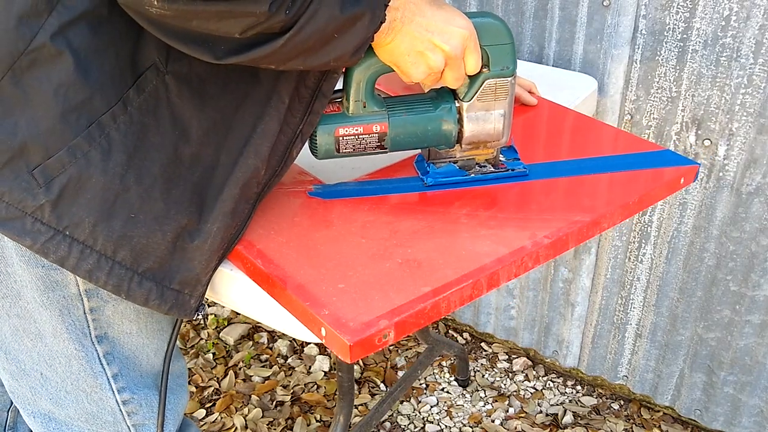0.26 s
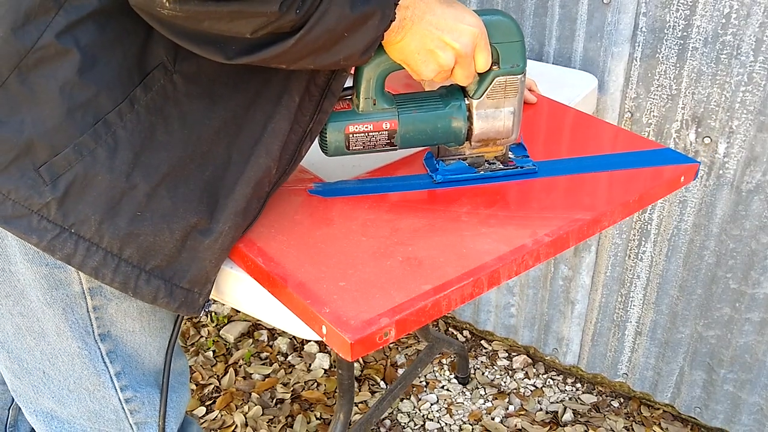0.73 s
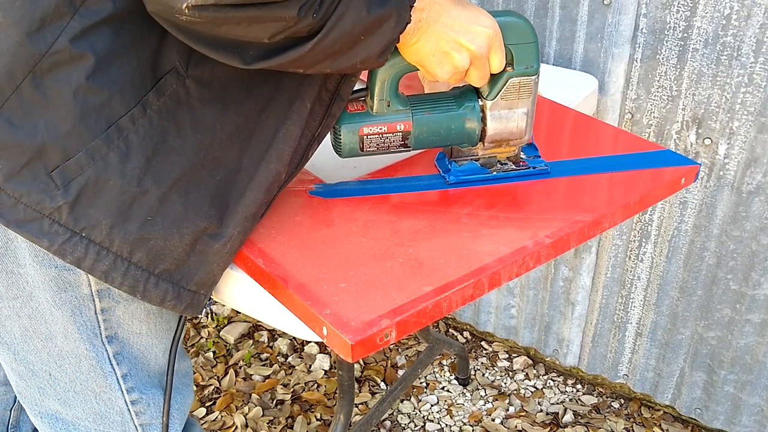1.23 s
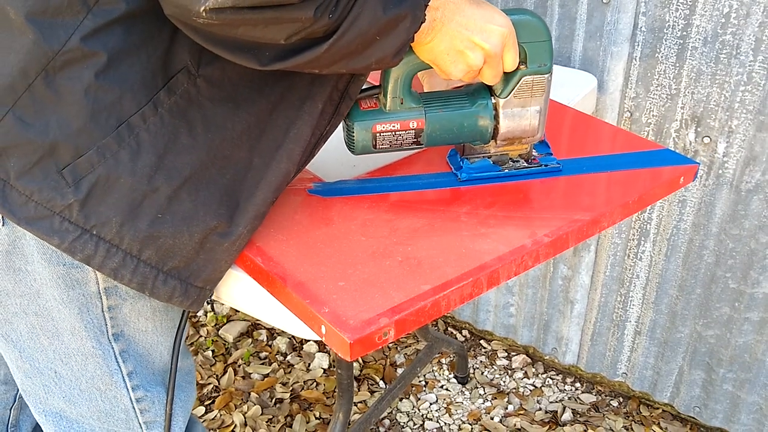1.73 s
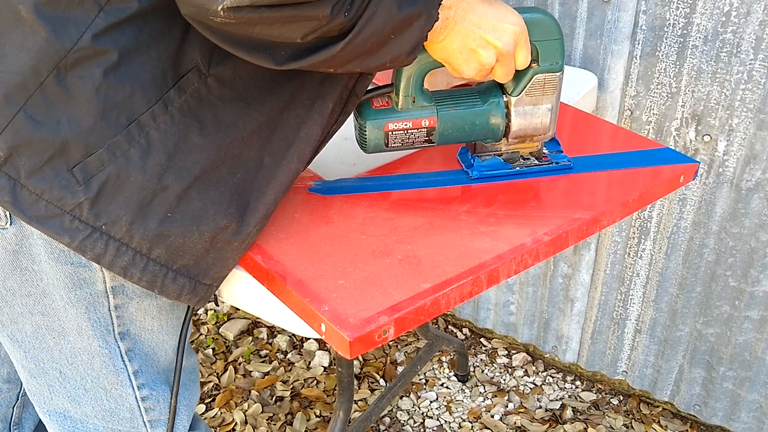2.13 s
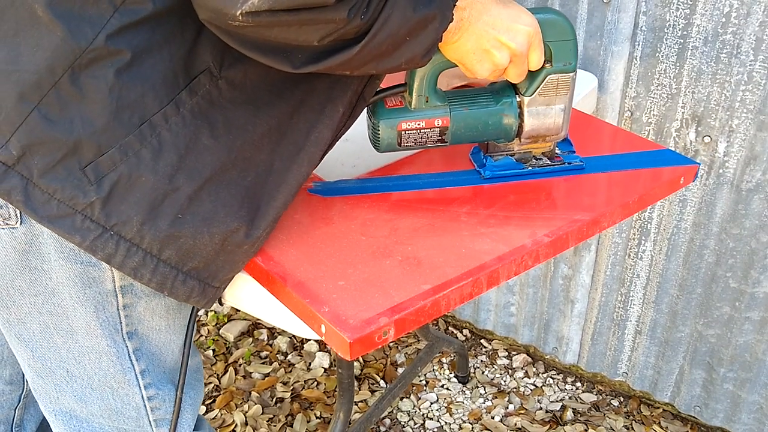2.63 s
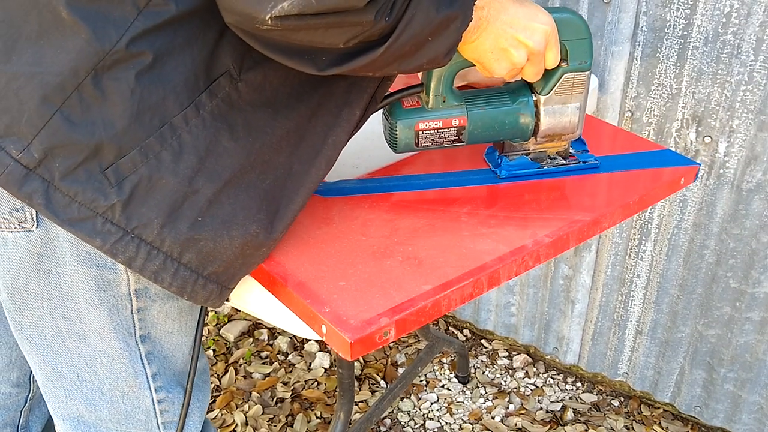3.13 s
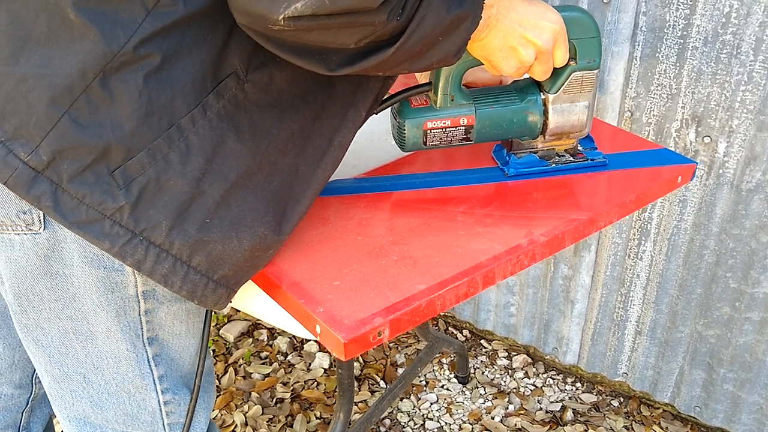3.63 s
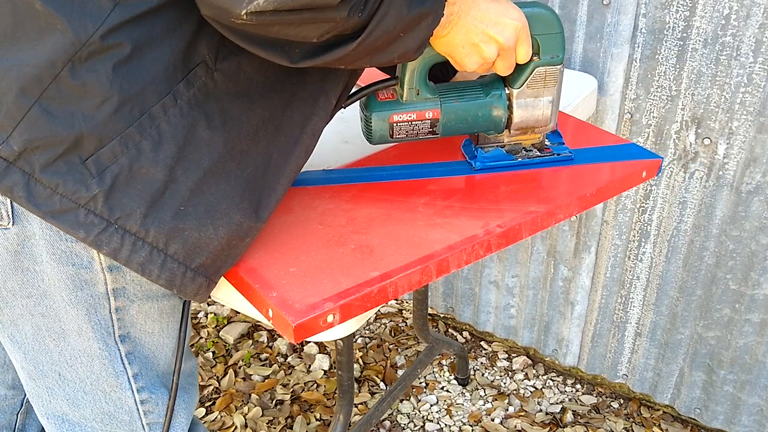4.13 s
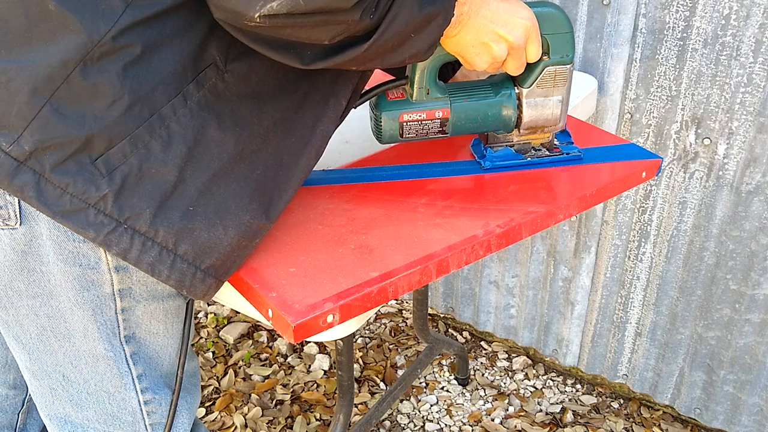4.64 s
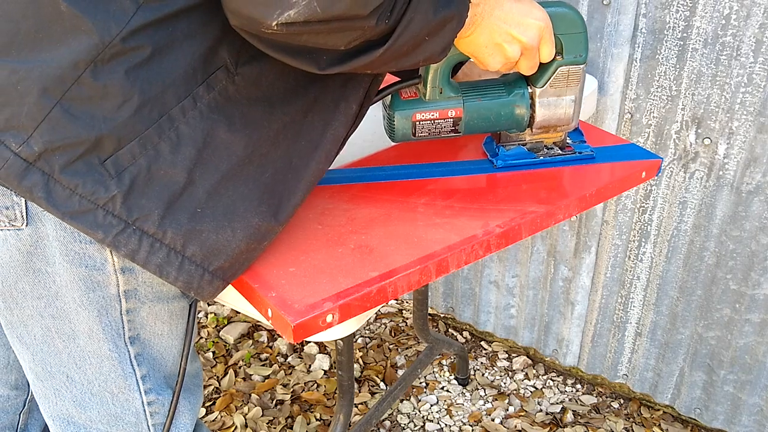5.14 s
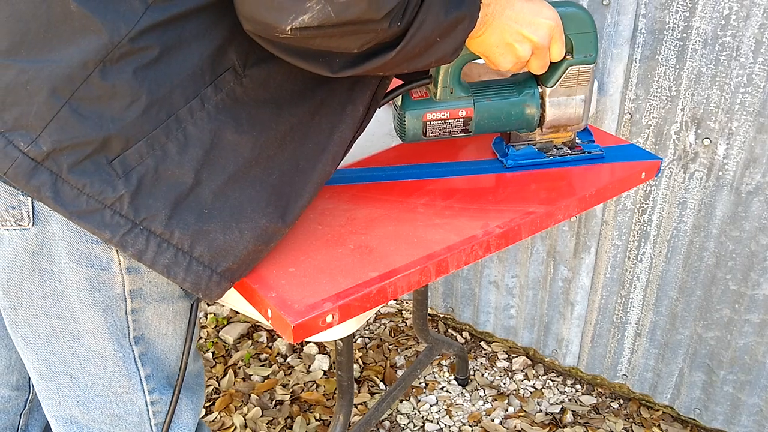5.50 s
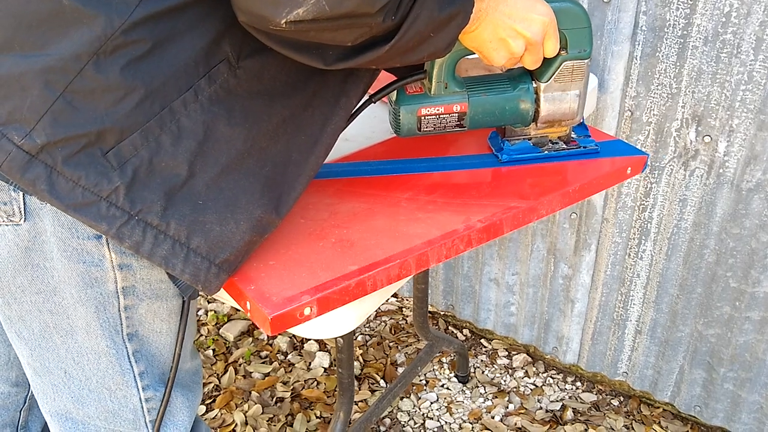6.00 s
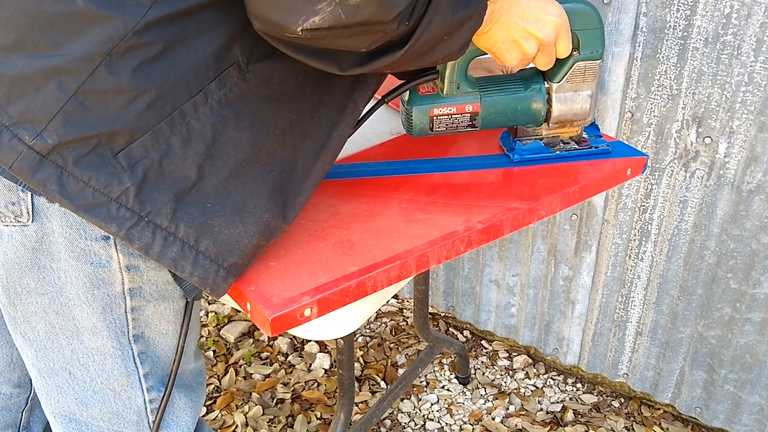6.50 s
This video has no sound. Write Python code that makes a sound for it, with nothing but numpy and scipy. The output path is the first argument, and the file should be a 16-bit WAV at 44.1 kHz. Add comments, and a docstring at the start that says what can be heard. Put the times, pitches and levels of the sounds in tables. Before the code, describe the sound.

A jigsaw rasps through a metal shelf, screeching in quick pulses as the blade bites, with brief squeals and a few soft knocks.

```python
"""Jigsaw cutting sheet steel

A jigsaw cuts a painted sheet-steel shelf outdoors. Its motor sags and recovers about seven times a
second as the blade bites; a screech and a faint whine swing with that speed over the rasp of the teeth.
The sheet's resonances colour rasp and screech. The cut eases twice, the blade sings, scrapes and
squeals as it bites and catches, and the shelf knocks on its support."""
import sys
import numpy as np
from scipy import signal
from scipy.fft import rfft, irfft, next_fast_len
from scipy.io import wavfile
from scipy.ndimage import uniform_filter1d

SR = 44100
rng = np.random.default_rng(int(sys.argv[2]) if len(sys.argv) > 2 else 0)


def to_wav(s):
    """Save 16-bit WAV."""
    ch = np.atleast_2d(s).T  # columns
    pcm = np.round(np.clip(ch, -1, 1) * 32767)  # PCM
    wavfile.write(sys.argv[1], SR, pcm.astype(np.int16))


N = 298116
TIME = np.arange(N) / SR
DIRECT = np.eye(2)[:, :1]  # sources have two rows: the direct sound and the scattered sound
EDGE_HZ, MODE_FADE_S = 15800, 0.28

# How hard the teeth are pushed into the steel: time_s, relative_db
TOOTH_PRESSURE = [(0, -51), (0.33, -51.0), (0.7, -50), (1.9, -50.5), (2.2, -49.5), (2.35, -51), (2.6, -50),
                  (3.62, -50.0), (3.74, -53), (4.1, -50.5), (4.4, -50), (5.1, -50), (5.63, -49),
                  (5.72, -53), (5.79, -48), (6.12, -50.5), (6.3, -49), (6.76, -49.5)]
# How hard the blade rubs in its slot: time_s, relative_db
SLOT_FRICTION = [(0, -51), (0.33, -53), (0.6, -43.5), (0.9, -41.5), (2.0, -40), (2.35, -43.5), (2.8, -42.5),
                 (3.55, -42.5), (3.72, -54), (4.03, -65), (4.2, -41), (5.0, -41), (5.62, -43), (5.72, -78),
                 (5.84, -39.5), (6.12, -47.5), (6.3, -42.5), (6.76, -47)]


def amp(db):
    """Decibels to amplitude ratio."""
    return 10 ** (np.asarray(db) / 20)


def unit_rms(x):
    """Normalisation to rms 1."""
    return x / np.sqrt(np.mean(x ** 2) + 1e-20)


def over_time(points):
    """Linear interpolation of a time table at every sample."""
    return np.interp(TIME, *np.transpose(points))


def over_frequency(points, hz):
    """Interpolation of a spectrum table on a log-frequency axis."""
    point_hz, value = np.transpose(points)
    return np.interp(np.log(hz + 1), np.log(point_hz + 1), value)


def fade(t, start, end, fade_s):
    """Trapezoidal window, with a ramp centred on each of start and end."""
    return np.clip(np.minimum(t - start, end - t) / fade_s + .5, 0, 1)


def wander(rate_hz):
    """Random modulation: noise of rms 1, low-passed at rate_hz."""
    size = next_fast_len(int(min(8 * rate_hz, SR) * N / SR))
    hz = np.arange(size // 2 + 1) * SR / N
    coarse = irfft(rfft(rng.standard_normal(size)) / (1 + (hz / rate_hz) ** 4), size)
    return unit_rms(np.interp(TIME, np.linspace(0, N / SR, size), coarse))


def spectra(x, size=1024):
    """Short-time Fourier transform: Hz as a column, seconds, values."""
    hz, t, z = signal.stft(x, SR, nperseg=size, noverlap=size - size // 4)
    return hz[:, None], t, z


def sound_of(z, size=1024):
    """Overlap-add synthesis from short-time spectra."""
    return signal.istft(z, nperseg=size, noverlap=size - size // 4)[1][..., :N]


def ripple(shape, bins, frames):
    """Random field of rms 1, correlated over so many frequency bins and time frames."""
    across_bins = uniform_filter1d(rng.standard_normal(shape), bins, 0)
    return unit_rms(uniform_filter1d(across_bins, frames, 1))


def resonate(x, hz, width_hz):
    """Heterodyne filtering: a flat-topped resonance of gain 1 that follows the curve hz."""
    carrier = np.exp(2j * np.pi * np.cumsum(hz) / SR)
    low_pass = signal.butter(3, width_hz / 2, fs=SR, output="sos")
    return 2 * (carrier * signal.sosfilt(low_pass, x * carrier.conj())).real


def ring(mode_hz, width_hz):
    """Random excitation of one mode by friction: a two-second loop of rms 1."""
    size = 2 * SR
    hz = np.fft.rfftfreq(size, 1 / SR)
    response = 1 / (1 + (2 * (hz - mode_hz) / width_hz) ** 2)
    loop = unit_rms(irfft(rfft(rng.standard_normal((2, size))) * response, size))
    return np.tile(loop, N // size + 1)[:, :N]


def chatter(turns, steady, decay_turns, uneven_db):
    """Amplitude modulation: friction noise bursts once a rotor turn, each time at a random strength."""
    strength = amp(uneven_db * rng.standard_normal(4096))[turns.astype(int)]
    bursts = strength * np.exp(-(turns % 1) / decay_turns)
    return unit_rms((steady + bursts) * rng.standard_normal((2, N)))


def rumble(level_db=-91.5, cutoff_hz=110, swing_db=3.5):
    """Slow modulation of low-passed noise: a faint rumble comes and goes."""
    low_pass = signal.butter(2, cutoff_hz, fs=SR, output="sos")
    low = signal.sosfilt(low_pass, rng.standard_normal((2, N)))
    return unit_rms(low * amp(swing_db * wander(4.4))) * amp(level_db)


def shelf_knocks(trim_db=-9, rattle_s=0.0056, scattered=0.71):
    """Impact excitation: soft, scuffing blows on the support ring the shelf's damped low modes."""
    # Blows: start_s, relative_db
    blows = [(1.713, -40), (1.783, -37), (1.792, -40), (1.815, -35), (1.834, -37), (1.865, -41),
             (1.888, -47), (2.319, -45), (3.805, -55), (5.44, -46), (5.778, -38.5), (5.799, -47),
             (6.24, -50), (6.53, -44)]
    # Low modes of the shelf, raised up to 4 % at each blow: pitch_hz, relative_db, t60_s
    modes = [(300, 1.5, 0.028), (370, 2, 0.044), (423, 2.5, 0.044), (561, 3.5, 0.053), (698, 1, 0.031),
             (940, -3, 0.032), (1020, 0, 0.024), (1420, -5, .025)]
    t, out = np.arange(SR // 5) / SR, np.zeros((2, N))
    for start, db in blows:
        thud = 0
        for k, (hz, mode_db, t60) in enumerate(modes):
            decay = amp(mode_db - 60 * t / t60)
            thud += (-1) ** k * decay * np.cos(2 * np.pi * hz * rng.uniform(1.0, 1.04) * t)
        force = rng.standard_normal((2, len(t))) * t * np.exp(-t / rattle_s) * [[1], [scattered]]
        knock = signal.fftconvolve(force / np.linalg.norm(force[0]), thud[None], axes=1)
        part = out[:, round(start * SR):][:, :len(t)]
        part += amp(db + trim_db) * knock[:, :part.shape[1]]
    return signal.sosfilt(signal.butter(4, 250, "high", fs=SR, output="sos"), out)


def strip_hum(turns, rotor_hz, roughness=.22, hum_db=-6):
    """Forced resonance: motor orders sweep the modes of the strip being cut; the teeth keep it humming."""
    # Modes of the strip: start_s, end_s, rotor_multiple, pitch_hz, width_hz, relative_db
    modes = [(1.6, 2.1, 6, 1020, 120, -63), (2.6, 3.65, 4, 670, 150, -65), (2.85, 3.65, 5, 950, 110, -68),
             (4.27, 5.0, 5, 778, 70, -58), (5.05, 5.7, 5, 780, 70, -64), (4.1, 4.8, 7, 1280, 90, -55),
             (4.8, 5.65, 7, 1255, 90, -56.5), (4.75, 5.7, 6, 1085, 130, -61.5),
             (5.2, 5.65, 8, 1465, 90, -65), (5.8, 6.4, 7, 1260, 130, -63)]
    out = 0
    for start, end, order, hz, width, db in modes:
        in_tune = 1 / (1 + (2 * (order * rotor_hz - hz) / width) ** 2)
        strength = np.sqrt(2) * in_tune * (1 + roughness * wander(40))
        driven = strength * np.cos(2 * np.pi * order * turns + roughness * wander(40))
        hum = amp(hum_db) * ring(hz, width)[0]
        out += amp(db) * fade(TIME, start, end, fade_s=.15) * (driven + hum)
    return out * (1 - DIRECT)


def motor_whine(turns, trim_db=-16, scattered=0.42):
    """Harmonic series: wavering tones at whole multiples of the rotor rate."""
    # Motor orders: rotor_multiple, relative_db
    orders = [(2, -15), (3, -7), (4, 0), (5, -11), (6, -7), (7, -8), (8, -10), (10, -7), (11, -11),
              (13, -11), (14, -11)]
    tones = sum(amp(db) * (1 + .3 * wander(20)) * np.cos(2 * np.pi * k * turns) for k, db in orders)
    return np.sqrt(2) * tones * amp(over_time(TOOTH_PRESSURE) + trim_db) * [[1], [scattered]]


def blade_squeals(trim_db=-1):
    """Friction-driven resonance: the catching blade squeals in a narrow band or scrapes in a wide one."""
    # Catches: peak_s, half_length_s, pitch_hz, width_hz, relative_db
    catches = [(.07, .04, 6350, 500, -50), (0.153, 0.11, 6850, 500, -48.5), (1.219, .05, 4300, 500, -52),
               (1.81, .12, 8000, 80, -48), (1.968, .05, 4200, 300, -56), (2.11, 0.091, 7700, 60, -46),
               (2.65, .6, 4345, 70, -56), (4.198, .04, 5140, 700, -55), (4.251, 1, 2391, 130.4, -61.5),
               (4.448, 0.82, 12650, 888.5, -53), (5.787, 0.038, 5150, 605.2, -48),
               (5.817, 0.021, 6920, 496, -41), (5.83, 0.058, 4400, 402, -53), (5.967, .06, 6610, 700, -50),
               (6.222, 0.053, 6800, 600, -48), (6.371, 0.046, 5140, 600, -52), (6.56, .05, 6200, 450, -49),
               (6.553, 0.062, 5190, 300, -53), (6.708, 0.07, 7390, 89, -44), (6.713, .06, 4950, 600, -48)]
    out = np.zeros((2, N))
    for peak, half_length, hz, width, db in catches:
        at = np.flatnonzero(abs(TIME - peak) < half_length)
        swell = np.cos(np.pi / 2 * (TIME[at] - peak) / half_length) ** 4
        out[:, at] += amp(db + trim_db) * unit_rms(ring(hz, width)[:, at]) * swell
    return out


def blade_singing(load, sharpness=3.2):
    """Modal vibration: the blade's own modes flare up with the load of a bite."""
    # Modes of the blade: start_s, end_s, pitch_hz, width_hz, full_load_db
    modes = [(.75, 1.3, 8330, 90, -51), (1.55, 2.35, 8080, 150, -44.5), (1.6, 2.35, 7650, 69.6, -52),
             (1.595, 2.347, 6900, 160, -50), (2.749, 3.35, 8300, 200, -52), (2.75, 3.501, 8560, 139, -53),
             (4.15, 5.0, 7020, 201, -54), (4.399, 5.0, 8305, 260, -46), (6.3, 6.901, 6330, 160, -57),
             (6.3, 6.9, 7900, 90, -56)]
    ringing = sum(amp(db) * fade(TIME, start, end, MODE_FADE_S) * ring(hz, width)
                  for start, end, hz, width, db in modes)
    return ringing * load ** sharpness


def sheet_resonance(x, lasting_db=1.56, brief_db=2.09, flicker_db=0.6, trim_db=-1.34):
    """Resonant filtering: steady, sliding and many short-lived modes colour the sound of the cut."""
    # Resonances of sheet and saw: centre_hz, width_hz, lift_db
    steady_modes = [(3260, 210, 0.5), (3850, 115, -3.5), (4450, 330, 0.5), (5300, 300, 1.3),
                    (6240, 250, 1.5), (6830, 110, 2), (7940, 190, -4.5), (8200, 130, 0.5),
                    (8550, 140, -1.5), (9000, 160, -3), (10300, 260, 4.5), (11340, 830, 6),
                    (14700, 450, 2.5)]
    # Modes that slide as the cut advances: start_s, end_s, first_hz, last_hz, width_hz, lift_db
    sliding_modes = [(.45, 1.53, 5260, 5300, 227, 4.2), (-1, 1.2, 6300, 5100, 160, 2.8),
                     (0, .7, 3300, 3220, 240, 1.5), (3.9, 6.38, 3293, 3327, 300, 1.5),
                     (.45, 0.94, 7600, 7300, 210, 7.8), (.75, 1.3, 8500, 10000, 98, 3.6),
                     (.8, 2.4, 7800, 8500, 149.2, 4.7), (.8, 1.9, 11000, 11000, 130, 3.2),
                     (.8, 1.45, 16000, 14900, 120, 9.2), (1.6, 2.34, 7800, 7000, 110, 6.7),
                     (1.5, 2.4, 4180, 4000, 110, 2.9), (2.3, 3.04, 4400, 4500, 140.2, 5),
                     (2.1, 2.74, 14370, 14900, 160, 5), (2.3, 2.5, 6600, 6800, 130, 10.5),
                     (2.35, 3.35, 8300, 8500, 130, 5.2), (2.1, 2.8, 10000, 7700, 110, 3.6),
                     (2.55, 4.24, 9370, 9600, 137, 3.6), (1.6, 3.5, 10900, 11000, 140, 5.8),
                     (2.6, 3.32, 6280, 5900, 170, 3.7), (3.25, 3.5, 8700, 11170, 180, 5.4),
                     (3.35, 3.6, 6900, 6900, 120, 3.9), (3.1, 3.73, 14200, 13000, 202, 4.16),
                     (4.1, 5.4, 7000, 7600, 300, 4.2), (4.7, 6.893, 4487, 4470, 90, 5.7),
                     (4.75, 5.16, 9400, 9800, 140, 5.2), (5.05, 5.9, 8630, 9400, 180, 3.2),
                     (5.5, 5.2, 10300, 9470, 80.1, 6.7), (5.7, 6.3, 7100, 6700, 180, 2.54),
                     (6.0, 6.7, 11400, 10620, 220.3, 6.4), (6.1, 6.6, 8420, 7300, 170, 4.2),
                     (6.2, 6.8, 6400, 6500, 160, 3.7), (6.25, 8.6, 7400, 6800, 140, 4)]
    hz, t, z = spectra(x)
    lift_db = sum(db / (1 + (2 * (hz - centre) / width) ** 2) for centre, width, db in steady_modes)
    for start, end, first_hz, last_hz, width, db in sliding_modes:
        centre = np.interp(t, [start, end], [first_hz, last_hz])
        peak = 1 / (1 + (2 * (hz - centre) / width) ** 4)
        flare = 1 + 0.15 * np.interp(t, TIME, wander(8))
        lift_db = lift_db + db * flare * fade(t, start, end, MODE_FADE_S) * peak
    lasting = lasting_db * ripple(z.shape[1:], bins=3, frames=110) * np.minimum(hz / 4000, 1)
    brief = brief_db * ripple(z.shape[1:], bins=2, frames=14)
    flicker = flicker_db * ripple(z.shape[1:], bins=20, frames=12)
    return sound_of(z * amp(lift_db + lasting + brief + flicker + trim_db))


def motor(half_bite_s=.075, bite_swell_db=1.1):
    """Load and speed: each bite slows the rotor and shifts the screech level; load is 1 at its height."""
    # Rotor speed between bites: time_s, rotor_hz
    free_speed = [(0, 165.8), (.5, 191.8), (1.1, 175), (1.45, 185.5), (2.1, 172.9), (2.6, 183),
                  (3.5, 195.5), (4.2, 185.7), (4.85, 181), (5.55, 179.6), (5.8, 178.2), (6.1, 191.2),
                  (6.76, 172.3)]
    # Bites of the blade: slowest_s, lost_hz, extra_screech_db
    bites = [(.07, 13, 6.5), (.145, 26, -4), (0.269, 14.4, 4), (.39, 17, -2), (0.501, 23.5, 1),
             (0.657, 21.4, -1), (.807, 29, 0), (.935, 30, -2.5), (1.086, 35, -2.5), (1.219, 31.6, 1),
             (1.355, 32.6, -1.5), (1.518, 21, 1), (1.666, 30, 0), (1.817, 26, -1), (1.965, 33.4, -1),
             (2.113, 25.6, -1), (2.264, 30.6, -1), (2.399, 16.5, -2), (2.558, 25.3, 1.5), (2.697, 26, 1),
             (2.851, 31.4, 1.5), (2.981, 32.6, 2), (3.126, 32, 1.5), (3.271, 30, 2.5), (3.415, 21.5, 1),
             (3.579, 28, 2.5), (3.941, 26.6, -5), (4.2, 41.5, 0), (4.348, 27.2, -4), (4.493, 29.4, -1),
             (4.629, 28, -3.5), (4.772, 26, -2), (4.926, 27.4, -1), (5.074, 18.7, -1.5), (5.213, 22.4, -1),
             (5.357, 26.3, -1), (5.489, 29, -2.5), (5.654, 30, 1), (5.814, 32, -2), (5.93, 25, 1),
             (6.052, 19.5, 0), (6.226, 19, 0.5), (6.371, 27, 1.5), (6.56, 38, 0.5), (6.711, 32, 6)]
    rotor_hz, screech_db, load = over_time(free_speed), over_time(SLOT_FRICTION), np.zeros(N)
    for slowest, lost_hz, extra_db in bites:
        at = np.flatnonzero(abs(TIME - slowest) < half_bite_s)
        bite = np.cos(np.pi / 2 * (TIME[at] - slowest) / half_bite_s) ** 2
        rotor_hz[at] -= lost_hz * bite
        screech_db[at] += (bite_swell_db + extra_db) * bite
        load[at] += bite
    return rotor_hz, screech_db, load


def tooth_rasp(turns, grain_db=1.5, boom_db=-0.78, clang_db=-9.5, clang_db_per_s=.5, fizz_db=1.5):
    """Broadband friction noise: teeth tear the steel, louder as the pressure on the saw rises."""
    # Spectrum of the tearing: frequency_hz, relative_density_db
    tearing = [(30, -53), (110, -19.5), (210, -15), (300, -1.5), (400, -3.5), (650, 1.5), (1200, -1.5),
               (2000, -2.5), (2700, -2), (3150, 2), (5000, 0.7), (6200, -0.2), (7400, 2.5), (9200, 2),
               (11000, -1.5), (13000, 0.5), (15800, -4.5)]
    # Course of the bass: time_s, relative_db
    bass = [(0, -9.5), (.45, -5.5), (1.1, -9), (1.4, -7), (2.15, -8.5), (2.35, -7.5), (3.0, -10.5),
            (3.72, -9), (4.0, -14), (4.15, -10.5), (5.6, -9), (6.1, -7.5), (6.76, -9.5)]
    # Course of the treble: time_s, relative_db
    treble = [(0, -4.5), (0.6, -1.5), (2.0, -3), (3.9, -4), (4.15, -1), (5.0, -2), (5.7, -4.5), (6.76, -2)]
    grit = chatter(turns, steady=4, decay_turns=.25, uneven_db=3) * amp(grain_db * wander(1200))
    hz, _, z = spectra(grit)
    z = z * amp(over_frequency(tearing, hz))
    low = 1 / (1 + (hz / 1050) ** 6)
    body = 1 / (1 + (hz / 2650) ** 12)
    high = 1 / (1 + (12000 / (hz + 1)) ** 12)
    core = (hz > 2800) & (hz < 6200)
    middle = sound_of(z * (1 - body - high)) / sound_of(z * core).std()
    bass_db = over_time(bass)
    boom = unit_rms(sound_of(z * low)) * amp(bass_db + boom_db)
    # The sheet clangs more as the cut lengthens, and shares part of the swings of the bass.
    clang_gain = amp(clang_db + clang_db_per_s * TIME + 0.46 * (bass_db - bass_db.mean()))
    clang = unit_rms(sound_of(z * (body - low))) * clang_gain
    fizz = unit_rms(sound_of(z * high * (hz < EDGE_HZ))) * amp(over_time(treble) + fizz_db)
    return (middle + boom + clang + fizz) * amp(over_time(TOOTH_PRESSURE))


def screech(turns, rotor_hz, screech_db, pitch_hz=9200, top_hz=9500, tonal=0.18, skirt_db=-4, trim_db=-2):
    """Periodic excitation: one scrape a turn rings a shrill resonance whose pitch rides on the speed."""
    ticks = np.diff(np.floor(turns), prepend=0) * amp(1.2 * wander(150))
    scrapes = chatter(turns, steady=0.88, decay_turns=0.94, uneven_db=-0.5)
    drive = np.sqrt(1 - tonal) * scrapes + np.sqrt(tonal) * unit_rms(ticks) * DIRECT
    waver = 1 + 0.019 * unit_rms(wander(50) + wander(8))
    hz = np.minimum(pitch_hz * (rotor_hz / rotor_hz.mean()) ** 0.83, top_hz) * waver
    core = unit_rms(resonate(drive, hz, width_hz=1500))
    skirt = unit_rms(resonate(drive, hz, width_hz=3600)) * amp(skirt_db)
    shrill = signal.sosfilt(signal.butter(2, 120, "high", fs=SR, output="sos"), core + skirt)
    return unit_rms(shrill) * amp(screech_db + trim_db)


def stereo_field(x):
    """Partial coherence: direct and scattered sound mix at two microphone ports, varying with pitch."""
    # Likeness of the two sides: frequency_hz, coherence
    likeness = [(50, .5), (250, .72), (600, .7), (1200, .25), (2000, .45), (3000, .82), (4300, .95),
                (5600, .93), (7200, .62), (8300, .75), (10100, .86), (11200, .7), (12000, .3), (13300, .6),
                (14300, .96), (15800, .7)]
    # Phase by which the left leads: frequency_hz, lead_rad
    lead = [(50, 2.6), (350, 3.1), (700, 2.9), (1050, 2.2), (1400, 1.4), (2050, 1), (2400, .3), (2800, 0),
            (5500, -.1), (6550, -.5), (7600, -1.1), (8250, -2.1), (9500, -2.8), (10300, -3.1),
            (11400, -3.4), (12200, -5.1), (13500, -6.2), (15800, -6.5)]
    # Level of left over right: frequency_hz, balance_db
    balance = [(300, -1), (700, -3.5), (1800, -2.5), (3200, -0.6), (5300, 0.5), (6500, 4), (8300, 2.5),
               (9400, 0), (11300, -7), (12300, 2), (14000, -1)]
    hz = np.fft.rfftfreq(N, 1 / SR)
    coherence = np.clip(over_frequency(likeness, hz), 0, 1)
    tilt = amp(over_frequency(balance, hz) / 2)
    direct = rfft(x[0]) * np.sqrt((1 + coherence) / 2)
    scattered = rfft(x[1]) * np.sqrt((1 - coherence) / 2)
    left = (direct + scattered) * tilt
    right = (direct - scattered) / tilt * np.exp(-1j * over_frequency(lead, hz))
    return irfft([left, right], N)


def scene():
    """Superposition of the sources; one motor speed drives the rasp, the screech and the whine."""
    rotor_hz, screech_db, load = motor()
    turns = np.cumsum(rotor_hz * (1 + .005 * wander(60))) / SR
    # Faster teeth rasp a little louder, and so does a hard bite.
    surge_db = 4 * (rotor_hz / uniform_filter1d(rotor_hz, size=13000) - 1)
    bite_db = 0.15 * (screech_db - over_time(SLOT_FRICTION)) + .5 * (load - .5)
    rasp = tooth_rasp(turns) * amp(surge_db + bite_db)
    cutting = sheet_resonance(rasp + screech(turns, rotor_hz, screech_db))
    tones = blade_singing(load) + motor_whine(turns) + strip_hum(turns, rotor_hz)
    return stereo_field(cutting + tones + blade_squeals() + shelf_knocks() + rumble())


def record(dry):
    """Band limiting: a linear-phase low-pass at EDGE_HZ."""
    low_pass = signal.firwin(1023, EDGE_HZ, window=("kaiser", 7), fs=SR)
    return signal.oaconvolve(dry, low_pass[None], "same", axes=1)


dry = scene()
out = record(dry)
to_wav(out)
```